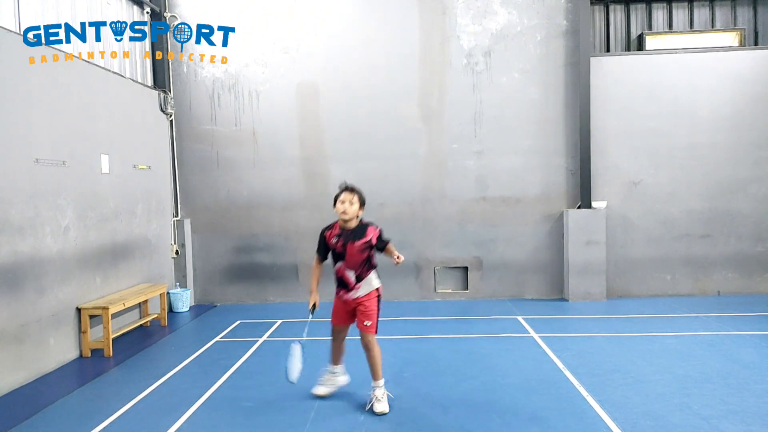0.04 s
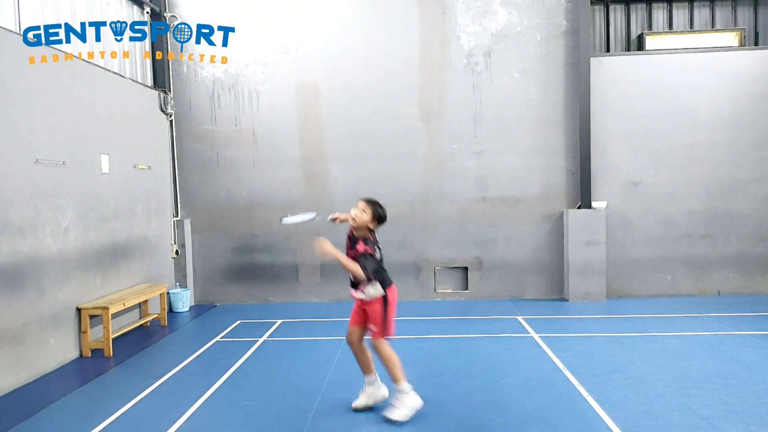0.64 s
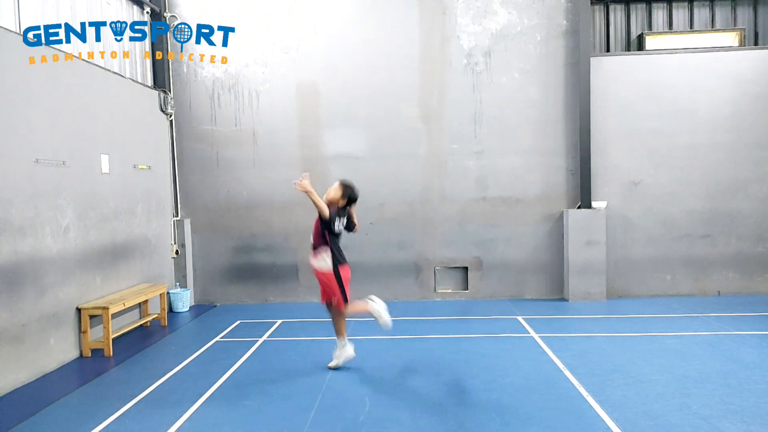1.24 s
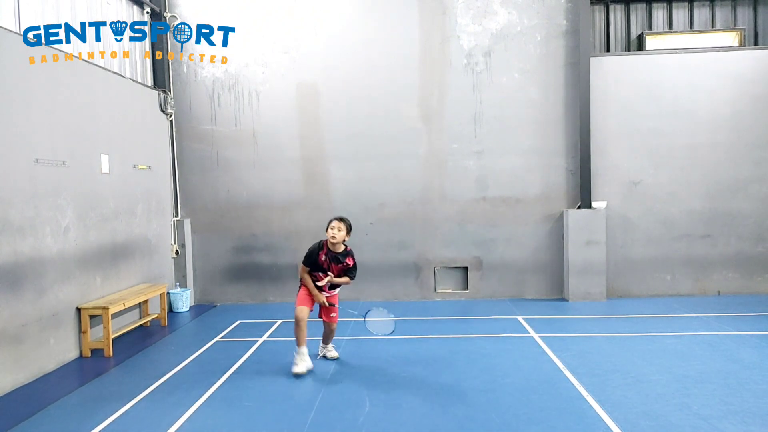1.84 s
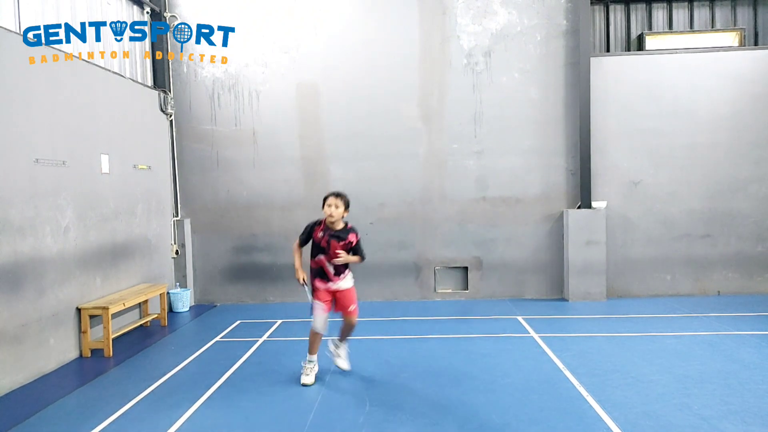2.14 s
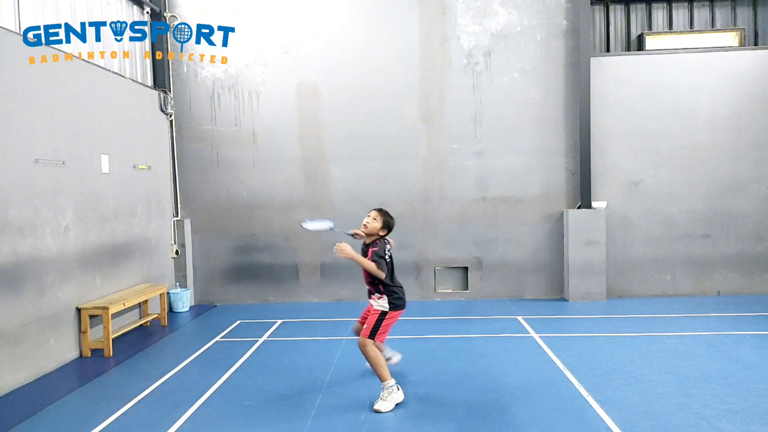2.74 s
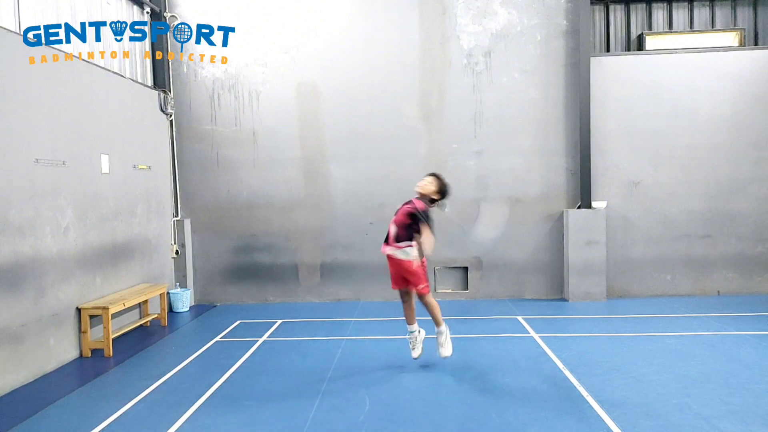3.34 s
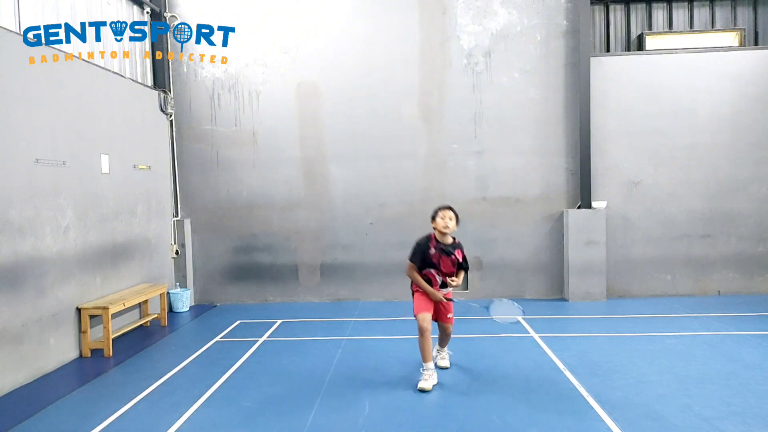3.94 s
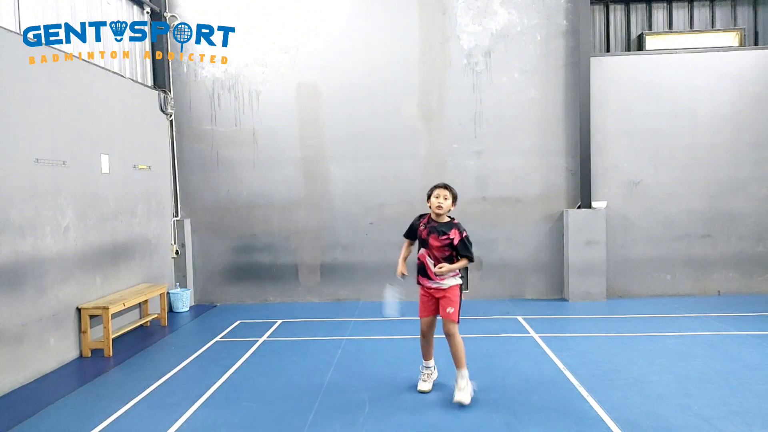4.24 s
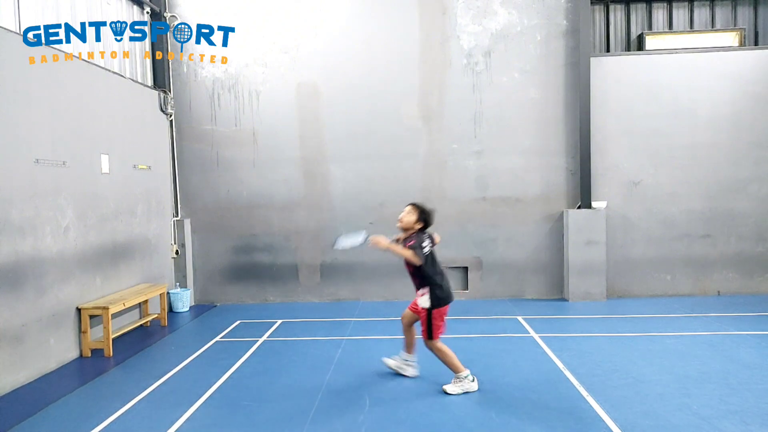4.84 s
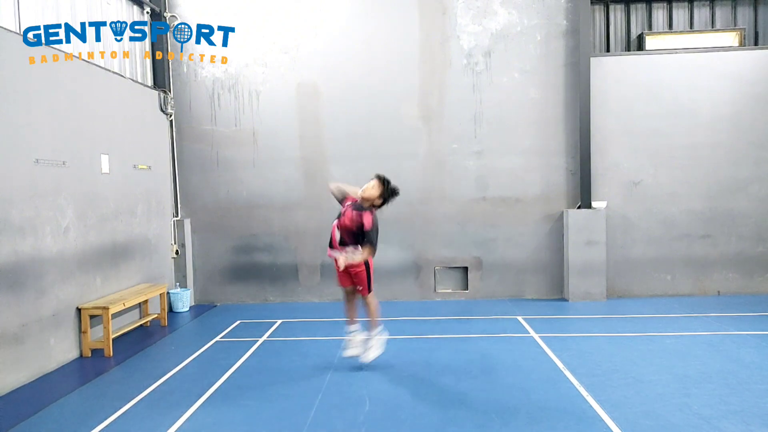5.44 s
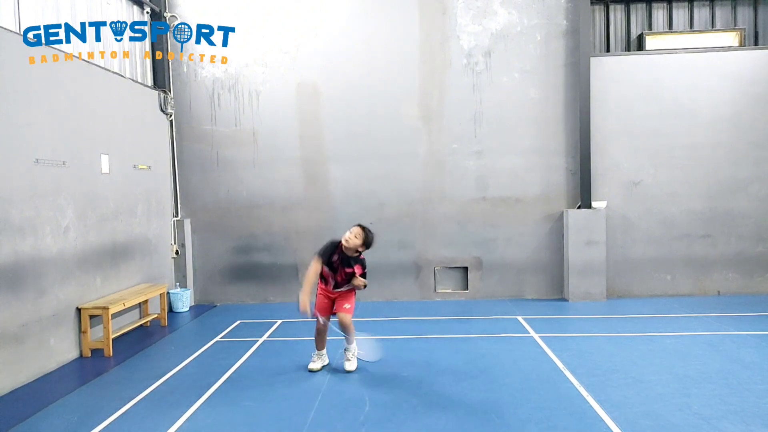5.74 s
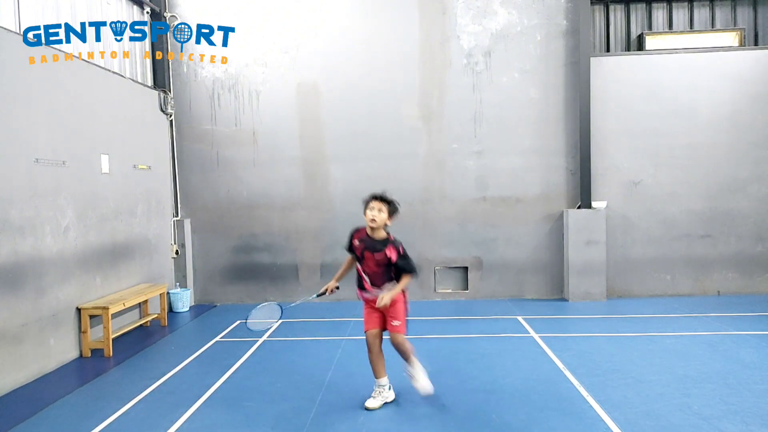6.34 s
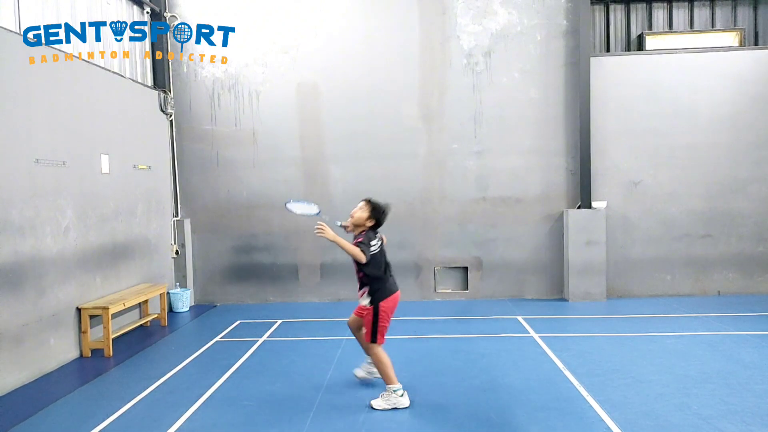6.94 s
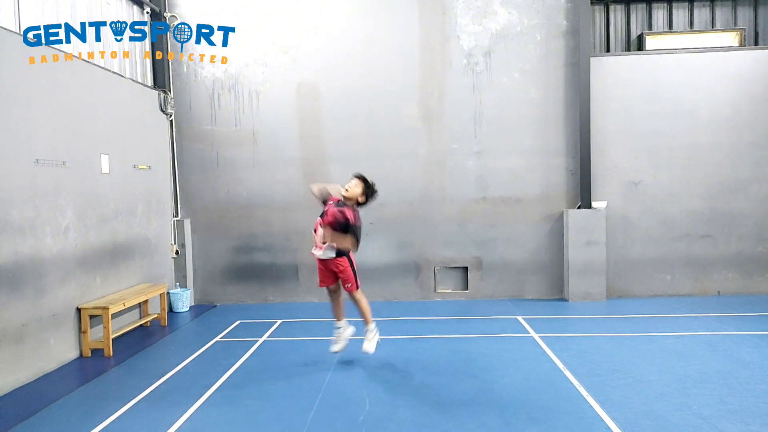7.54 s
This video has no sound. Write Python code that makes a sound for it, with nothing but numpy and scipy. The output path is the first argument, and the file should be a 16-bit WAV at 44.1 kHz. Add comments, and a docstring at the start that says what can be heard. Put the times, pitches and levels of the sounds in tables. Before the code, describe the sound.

A shuttlecock is lifted with a ringing tap and smashed back with a loud crack, four times, in a large echoing hall.

```python
"""Badminton drill in a large, hard-walled sports hall, opening on the echo of a smash.
A feeder beside the microphone lifts a shuttle; the string bed rings. A player further off runs back,
shoes thudding and at times squeaking, takes off with a scuff and smashes: a crack over the cork's knock.
Each loud hit pushes the recorder's gain down, so the echo seems to hang while the gain recovers.
The cycle repeats about every 2 s, over light knocks around the court and quiet hall air."""
import sys
import numpy as np
from scipy import signal
from scipy.fft import rfft, irfft, next_fast_len
from scipy.io import wavfile
from scipy.ndimage import uniform_filter1d

SR = 44100
rng = np.random.default_rng(int(sys.argv[2]) if len(sys.argv) > 2 else 0)


def wav_out(sig):
    """Save sig, one row per channel (or a flat mono array), as 16-bit PCM at SR to the path in sys.argv[1]."""
    wavfile.write(sys.argv[1], SR, np.round(np.clip(np.atleast_2d(sig).T, -1, 1) * 32767).astype(np.int16))


N = 338247
LEAD = SR // 2  # samples ahead of time zero
TOTAL = N + LEAD
AGE_S = np.arange(SR // 4) / SR
CUTOFF_HZ = 16000

# smashes: (time [s], level [dB], hall ring [dB], hall tilt [dB/oct], near echo [dB], footwork [dB])
SMASH_HITS = [(-0.36, 9.5, -8.5, 1.9, -9, -34.5), (1.677, 15, -18, 0.1, -9.5, -47),
              (3.6835, 16, -18, -0.06, -5, -32.5), (5.7635, 15.5, -35, 0.5, -13, -33.5),
              (7.83, 16, -19, 0, -9, -41)]
# feeds: (time [s], body [dB], mode 2 boost [dB], ping re body [dB], hall tilt [dB/oct], Doppler [ratio])
FEED_HITS = [(0.2116, 8.5, 12, -14, -0.76, 0.0046), (2.2999, 12, -1.5, -15, -0.6, 0.021),
             (4.2318, 11.5, -9.5, -13.5, -0.57, .039), (6.2706, 13, 5, -18.5, 0.65, 0.037)]
# shoes on turns: (time [s], length [s], pitch [Hz], level [dB], scuff re squeal [dB], hall send [dB])
TURN_SQUEAKS = [(3.214, 0.02, 13200, -43, 0, -31), (3.254, 0.014, 12100, -36.5, -4, -40),
                (6.634, 0.013, 10800, -48, 11, -34), (6.917, 0.0236, 12200, -34.5, -8.5, -27.5),
                (6.99, 0.02, 11900, -41, -2, -30), (7.027, 0.0132, 5690, -23.5, -12.5, -35.5)]
# light knocks around the court: (time [s], pitch [Hz], level [dB])
LIGHT_KNOCKS = [(.277, 437, -2.5), (0.452, 1200, -12), (4.121, 850, -8.5), (5.02, 3800, -39.5),
                (7.339, 1440, -32)]
# cork on the string bed, smash and feed: (frequency [Hz], level [dB], t60 [s])
SMASH_CORK_MODES = [(720, -5.5, 0.013), (1090, -11, 0.023), (1514, -23.5, 0.013)]
FEED_CORK_MODES = [(383, 1.76, 0.0061), (850, -10.5, .007)]
# feeder's string bed: (frequency [Hz], level [dB], t60 [s])
STRING_MODES = [(1230.3, 5, 0.1), (1947, -8.5, 0.12), (2550, -16, .09), (3510, -21, 0.14)]
# radiation directions of a swung racket: (Doppler shift [ratio], level [dB])
RACKET_DIRECTIONS = [(-.04, 7), (0, 1.5), (0.04, 6), (0.063, 9.5)]
# noise spectra: (frequency [Hz], relative density [dB])
SMASH_HALL_SPECTRUM = [(60, -66.5), (115, -26.5), (200, -13.5), (440, -8.5), (720, 1), (1020, -5.5),
                       (1360, -4.5), (1750, -12), (3000, -20.5), (4000, -14.5), (5000, -19.5),
                       (6600, -12.5), (7800, -21.5), (12500, -21), (16000, -42)]
FEED_HALL_SPECTRUM = [(60, -34), (110, -19.5), (200, -11), (400, 1.9), (730, 4), (1050, -2.5), (1650, -13),
                      (2900, -16.5), (3900, -10), (4900, -20.5), (6500, -12.5), (7800, -23), (12000, -21.5),
                      (16000, -47.5)]
CRACK_SPECTRUM = [(600, -15), (2100, .5), (3000, -11.5), (4100, 0), (5000, -10), (6600, -2), (7800, -9),
                  (12000, -4.5), (16000, -23)]
SCATTER_SPECTRUM = [(800, -11), (2500, -1.5), (6000, -0.5), (8000, -10), (12000, -12.5), (16000, -28.5)]  # feed's tick off the near floor and wall
STEP_SPECTRUM = [(40, -44), (90, -14), (250, 3), (450, -1), (1000, -43), (3000, -41.5), (7000, -33),
                 (14000, -63)]
AIR_SPECTRUM = [(25, -28), (48, -20.5), (68, 0), (100, -6.5), (140, -2), (270, -3), (400, -6), (950, -11.5),
                (1300, -16.5), (1800, -21.5), (4100, -32), (5000, -37), (6700, -29), (7800, -39),
                (16000, -39)]
# hall decay: (frequency [Hz], t60 [s])
HALL_DECAY = [(100, 1.67), (400, 1.476), (1200, 1.575), (3000, 1.813), (6500, 1.28), (9000, 1.02),
              (14000, 0.58)]


def smashes(crack_db=-19.5, frame_db=-18, whip_db=-24.5, hall_db=-20,
            near_wall_s=0.0186, far_wall_s=0.087, far_wall_db=-18):
    """Whip of air, hard crack over the cork's knock, two wall echoes, hall."""
    out = np.zeros(TOTAL)
    for s, db, ring_db, tilt_db_oct, near_wall_db, _ in SMASH_HITS:
        knock = radiate(ring(SMASH_CORK_MODES), corner_hz=393) + ring([(1382, frame_db, 0.04)])
        hit = from_db(db) * (from_db(crack_db) * crack(length_s=0.0056) - knock)
        add(out, s - AGE_S[-1], from_db(whip_db) * swish(hz=800, rise_s=0.0057))
        add(out, s, hit)
        add(out, s + near_wall_s, from_db(near_wall_db) * hit)
        add(out, s + far_wall_s, from_db(far_wall_db) * hit)
        add(out, s, from_db(db + hall_db) * hall_tail(tilted(SMASH_HALL_SPECTRUM, tilt_db_oct)))
        add(out, s, from_db(ring_db) * strings_in_hall([(1237, 0)]))
    return radiate(out, corner_hz=90)


def feeds(tick_db=-1.5, swing_db=-19, scatter_db=-15, scatter_s=0.023,
          hall_db=-14, ring_db=-13.5, off_centre_share=0.36):
    """Underhand swing, soft low thump and tick, ping of the strings."""
    out = np.zeros(TOTAL)
    for s, db, boost_db, ping_db, tilt_db_oct, doppler in FEED_HITS:
        # off-centre contact wakes mode 2 and brightens the ring in the hall
        near_modes, far_modes = [], []
        for k, (hz, mode_db, t60_s) in enumerate(STRING_MODES):
            near_modes.append((hz, mode_db + boost_db * (k == 1), t60_s))
            far_modes.append((hz, mode_db + off_centre_share * boost_db * (k > 0)))
        body = ring(FEED_CORK_MODES) + from_db(ping_db) * strings_direct(near_modes, doppler)
        tick = from_db(tick_db) * crack(length_s=0.0035, tilt_db_oct=-3.5)
        add(out, s - AGE_S[-1], from_db(swing_db) * swish(hz=556, rise_s=0.013))
        add(out, s, from_db(db) * radiate(body, corner_hz=252) + tick)
        scatter = noise(SCATTER_SPECTRUM) * np.exp(-AGE_S / scatter_s)
        add(out, s, from_db(scatter_db) * scatter)
        tail = hall_tail(tilted(FEED_HALL_SPECTRUM, tilt_db_oct), build_s=0.1, thin_share=0.27)
        add(out, s, from_db(hall_db) * tail)
        add(out, s, from_db(ring_db) * strings_in_hall(far_modes))
    return out


def crack(length_s, tilt_db_oct=0.56):
    """Feathers and strings snap while the shuttle is in contact."""
    contact = np.exp(-(AGE_S / length_s) ** 4)
    return radiate(noise(tilted(CRACK_SPECTRUM, tilt_db_oct)) * contact, corner_hz=500)


def strings_direct(modes, doppler, slowing_s=0.15, release_s=0.0025):
    """Strings ring once the shuttle leaves: flat while swung away, rising as the racket slows."""
    heard_age_s = AGE_S - doppler * slowing_s * (1 - np.exp(-AGE_S / slowing_s))
    release = 1 - np.exp(-(AGE_S / release_s) ** 2)
    return release * np.interp(heard_age_s, AGE_S, ring(modes))


def strings_in_hall(modes, t60_s=0.11):
    """A moving racket sends a different pitch each way, widening the echo; high modes die sooner."""
    lowest_hz = modes[0][0]
    beams = []
    for shift, beam_db in RACKET_DIRECTIONS:
        shifted = [(hz * (1 + shift), db, t60_s * np.sqrt(lowest_hz / hz)) for hz, db in modes]
        beams.append(from_db(beam_db) * ring(shifted))
    return radiate(sum(map(hall, beams)), corner_hz=700) / np.sqrt(np.sum(np.square(beams)))


def swish(hz, rise_s):
    """Air through the racket swells up to contact."""
    rush = noise([(hz / 4, -28), (hz, 0), (hz * 3, -23), (9000, -33), (16000, -52)])
    return rush * np.exp(-AGE_S[::-1] / rise_s)


def ring(modes):
    """Decaying sines of a struck body."""
    return sum(from_db(db - 60 * AGE_S / t60_s) * np.sin(2 * np.pi * hz * AGE_S)
               for hz, db, t60_s in modes)


def radiate(sound, corner_hz):
    """A small, open body cannot push out long waves."""
    return signal.sosfilt(signal.butter(3, corner_hz, "high", fs=SR, output="sos"), sound)


def squeaks(take_off_lead_s=0.283, take_off_length_s=0.046, take_off_hz=9900):
    """Shoes squeak on sharp turns and scuff at each take-off; the hall holds their pitch."""
    out = np.zeros(TOTAL)
    # columns as in TURN_SQUEAKS
    take_offs = [(s - take_off_lead_s, take_off_length_s, take_off_hz, footwork_db - 21, -0.5, -35.5)
                 for s, *_, footwork_db in SMASH_HITS]
    for s, length_s, hz, db, scuff_db, hall_db in TURN_SQUEAKS + take_offs:
        squeak = from_db(db) * slip(length_s, hz, scuff_db)
        add(out, s, squeak)
        add(out, s, from_db(hall_db) * hall(squeak))
    return out


def slip(length_s, hz, scuff_db, fall_share=0.045, jitter_share=0.017, overtone_db=-7, stutter_db=3.0):
    """Rubber sole sticks and slips on the mat: unsteady, falling squeal inside a scuff."""
    size = int(length_s * SR)
    flutter_spectrum = [(30, -20), (100, 0), (350, 0), (1200, -30), (5000, -70)]
    wobble = noise(flutter_spectrum)[:size]
    grip = noise(flutter_spectrum)[:size]
    pitch_hz = hz * (1 - fall_share * np.linspace(0, 1, size)) * (1 + jitter_share * wobble)
    phase = 2 * np.pi * np.cumsum(pitch_hz) / SR
    overtone = from_db(overtone_db) * np.sin(2 * phase) * (2 * hz < CUTOFF_HZ)
    scuff = noise([(hz * 0.6, -30), (hz * 1.004, 0), (hz, -27)])[:size]
    envelope = unit_rms(from_db(stutter_db * grip)) * signal.windows.tukey(size, 0.5)
    return (np.sin(phase) + overtone + from_db(scuff_db) * scuff) * envelope


def steps(run_up_s=0.83, step_s=0.16, count=5, drop_db_per_step=1, roll_s=0.039, hall_db=-38):
    """Feet roll onto the cushioned mat before each smash, ever lighter; the hall blurs the thuds."""
    out = np.zeros(TOTAL)
    for s, *_, footwork_db in SMASH_HITS:
        for k in range(count):
            thud = noise(STEP_SPECTRUM) * AGE_S / roll_s * np.exp(-AGE_S / roll_s)
            add(out, s - run_up_s + k * step_s, from_db(footwork_db - drop_db_per_step * k) * thud)
    return out + from_db(hall_db) * hall(out)[:TOTAL]


def knocks(hall_db=-39):
    """Light knocks around the court: short, hollow, weak upper mode."""
    out = np.zeros(TOTAL)
    for s, hz, db in LIGHT_KNOCKS:
        knock = ring([(hz, 0, 0.014), (hz * 2.6, -13, 0.007)])
        add(out, s, from_db(db) * radiate(knock, corner_hz=hz / 2))
    return out + from_db(hall_db) * hall(out)[:TOTAL]


def hall_tail(spectrum, build_s=0.13, thin_share=0.55, grain_db=1.5, blend_s=0.23, patchy_db=2.0):
    """Hall response to a snap: lumpy reflections thicken into an uneven wash; treble dies first."""
    t = np.arange(2 * SR) / SR
    hz, frame_s, cells = signal.stft(noise(spectrum, len(t)), SR, nperseg=256)
    lumps_db = grain_db * np.exp(-frame_s / blend_s) * rng.standard_normal(len(frame_s))
    patches = uniform_filter1d(rng.standard_normal(cells.shape), size=10, axis=1)
    decay_db = 60 * frame_s / at_hz(HALL_DECAY, hz)[:, None]
    fade = from_db(lumps_db + patchy_db * patches / patches.std() - decay_db)
    wash = signal.istft(cells * fade, SR)[1][:len(t)]
    return wash * (1 - thin_share * np.exp(-t / build_s))


def hall(sound):
    """Reverberation of any sound."""
    return signal.fftconvolve(sound, hall_tail([(1, 0), (SR, 0)]))


def hall_air(level_db=-45.5):
    """Quiet, steady air of the hall, mostly bass."""
    return from_db(level_db) * noise(AIR_SPECTRUM, next_fast_len(TOTAL))[:TOTAL]


def gain_control(x, threshold_db=-8.5, release_db_per_s=33, ease_s=0.11):
    """Gain drops at once on a loud hit, creeps back and eases off near full recovery."""
    excess_db = np.maximum(running_level_db(x, size=128) - threshold_db, 0)
    recovery_db = release_db_per_s * np.arange(len(x)) / SR
    cut_db = np.maximum.accumulate(excess_db + recovery_db) - recovery_db
    pole = np.exp(-1 / (ease_s * SR))
    cut_db = np.maximum(cut_db, signal.lfilter([1 - pole], [1, -pole], cut_db))
    return x * from_db(-uniform_filter1d(cut_db, size=32))


def noise_reduction(x, open_db=-33, knee_db=7, depth_db=8):
    """The recorder turns quiet passages down, hurrying the end of each echo."""
    closed_share = (1 - np.tanh((running_level_db(x, size=2048) - open_db) / knee_db)) / 2
    return x * from_db(-depth_db * closed_share)


def running_level_db(x, size):
    """Mean power over a sliding window."""
    return 10 * np.log10(np.abs(uniform_filter1d(x ** 2, size=size)) + 1e-12)


def noise(spectrum, size=len(AGE_S)):
    """Coloured noise, rms 1."""
    gain = from_db(at_hz(spectrum, np.fft.rfftfreq(size, 1 / SR)))
    return unit_rms(irfft(rfft(rng.standard_normal(size)) * gain, size))


def tilted(spectrum, db_per_octave):
    """Tilt about 1 kHz: faster, flatter contact sends out more treble."""
    return [(hz, db + db_per_octave * np.log2(hz / 1000)) for hz, db in spectrum]


def at_hz(points, hz):
    """Table lookup on a log-frequency axis."""
    points_hz, values = np.transpose(points)
    return np.interp(np.log(np.maximum(hz, 1)), np.log(points_hz), values)


def from_db(db):
    """Decibels to gain."""
    return 10 ** (np.asarray(db) / 20)


def unit_rms(x):
    """Scale to rms 1."""
    return x / np.sqrt(np.sum(x ** 2) + 1e-20) * np.sqrt(len(x))


def add(track, s, sound):
    """Mix in at time s; the track starts LEAD samples early."""
    start = max(round(s * SR) + LEAD, 0)
    track[start:start + len(sound)] += sound[:max(len(track) - start, 0)]


def scene():
    """One microphone, same in both channels."""
    air = hall_air()
    mono = smashes() + feeds() + knocks() + squeaks() + steps() + air
    return np.tile(noise_reduction(gain_control(mono))[LEAD:], (2, 1))


def record(dry):
    """Peak clip, then steep low-pass."""
    low_pass = signal.cheby2(16, 70, CUTOFF_HZ + 1000, fs=SR, output="sos")
    return signal.sosfilt(low_pass, np.clip(dry, -0.85, 0.85))


dry = scene()
out = record(dry)
wav_out(out)
```